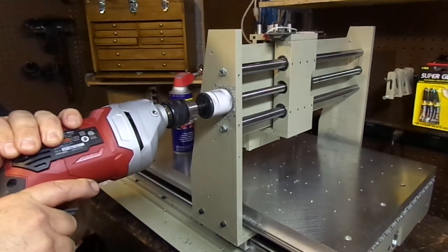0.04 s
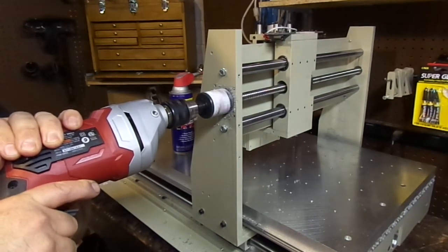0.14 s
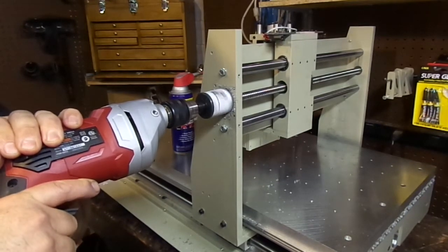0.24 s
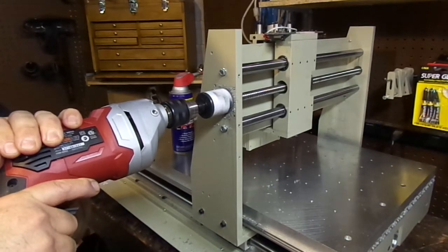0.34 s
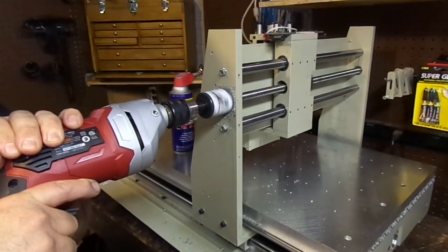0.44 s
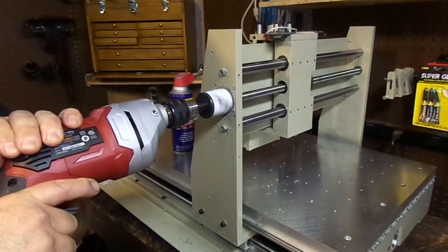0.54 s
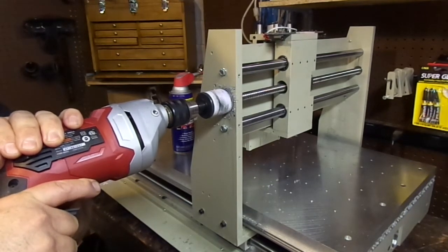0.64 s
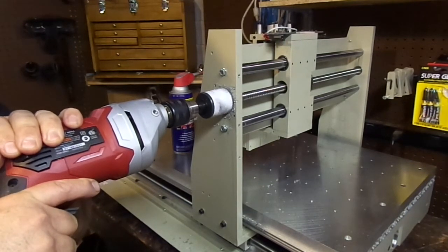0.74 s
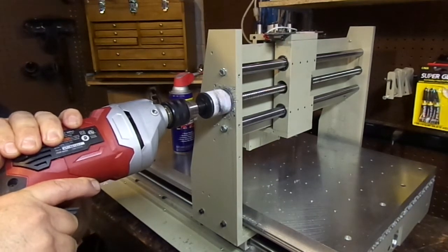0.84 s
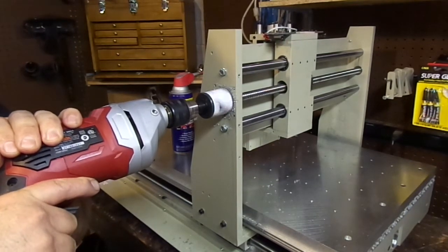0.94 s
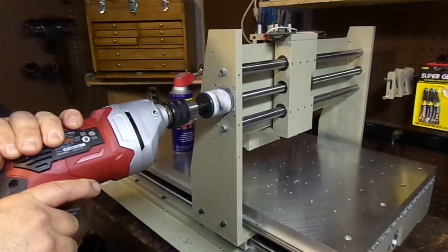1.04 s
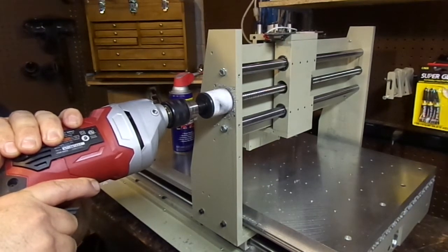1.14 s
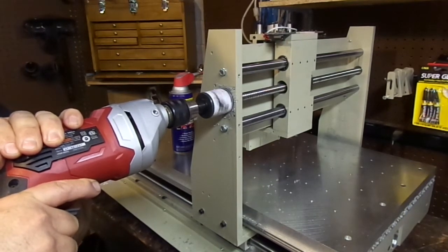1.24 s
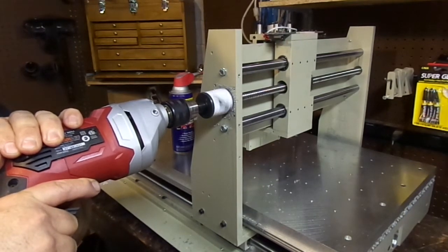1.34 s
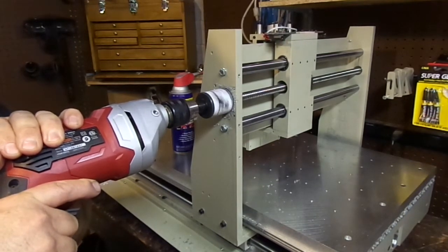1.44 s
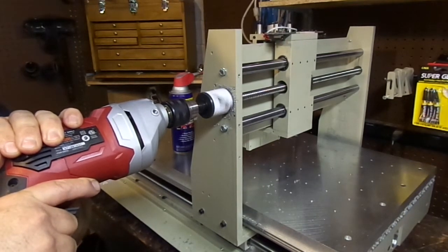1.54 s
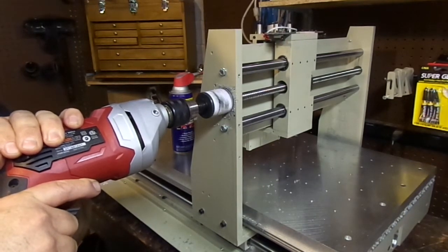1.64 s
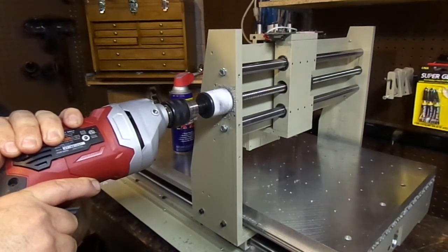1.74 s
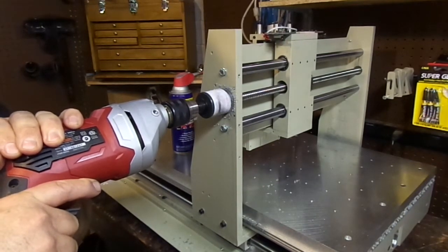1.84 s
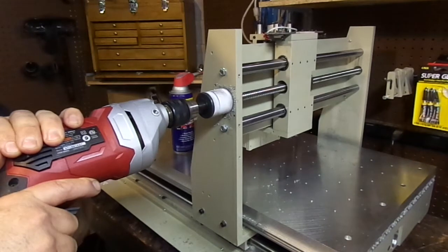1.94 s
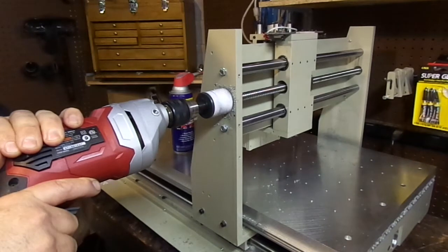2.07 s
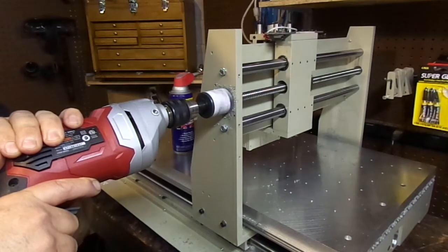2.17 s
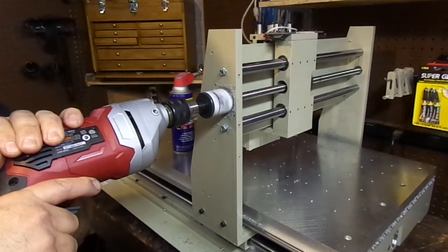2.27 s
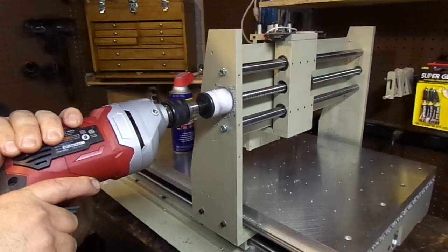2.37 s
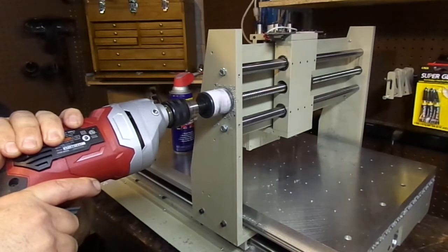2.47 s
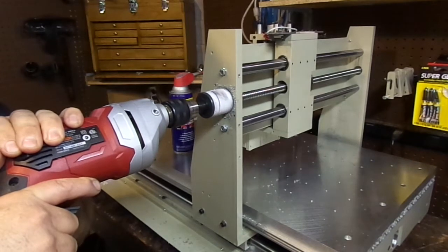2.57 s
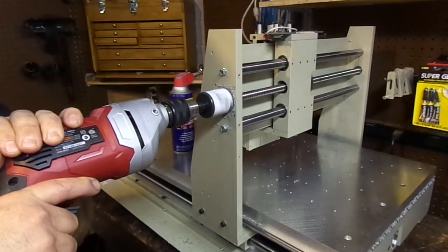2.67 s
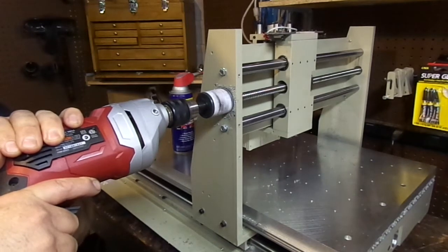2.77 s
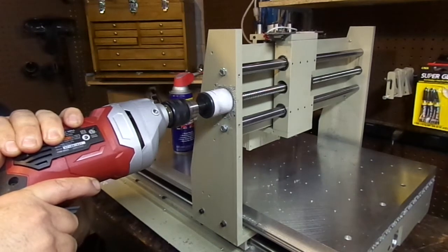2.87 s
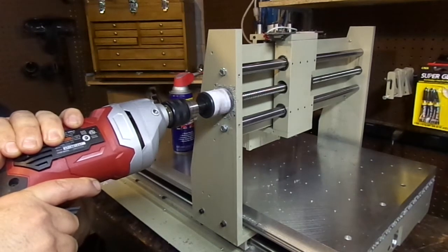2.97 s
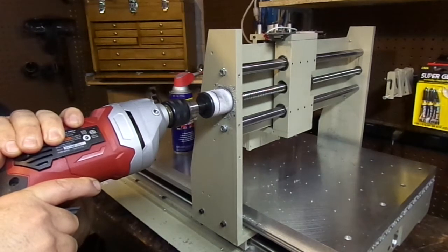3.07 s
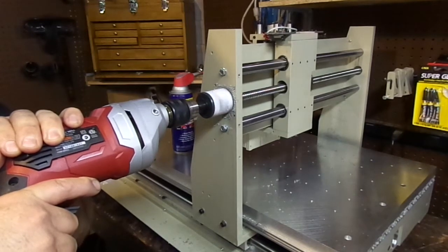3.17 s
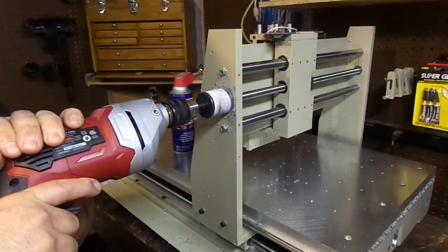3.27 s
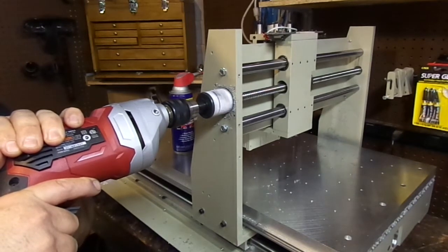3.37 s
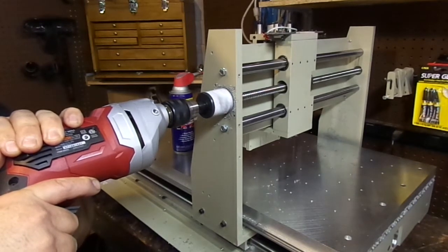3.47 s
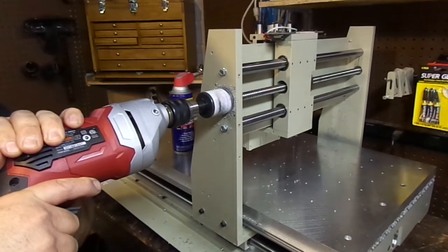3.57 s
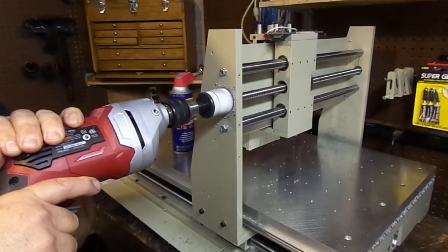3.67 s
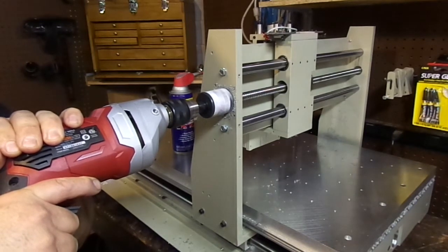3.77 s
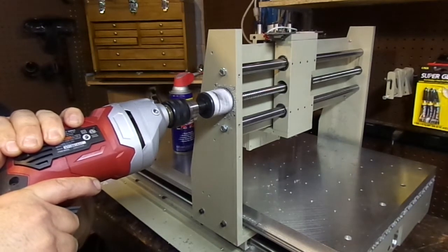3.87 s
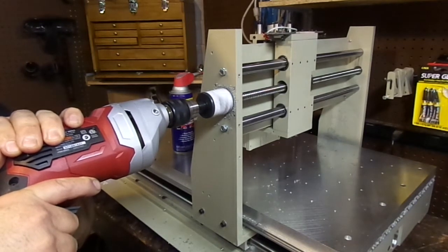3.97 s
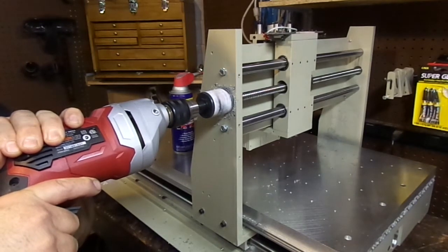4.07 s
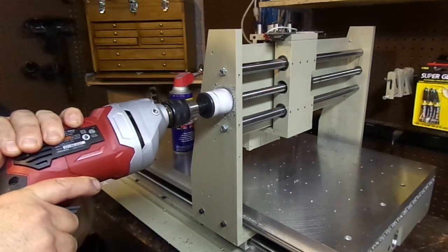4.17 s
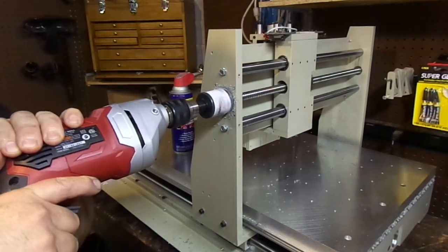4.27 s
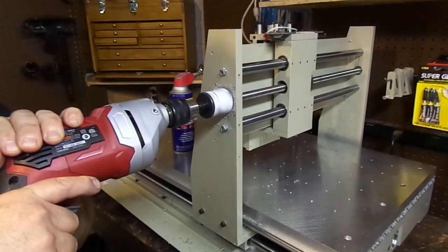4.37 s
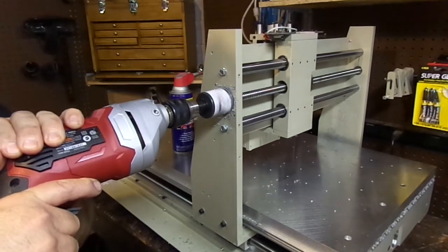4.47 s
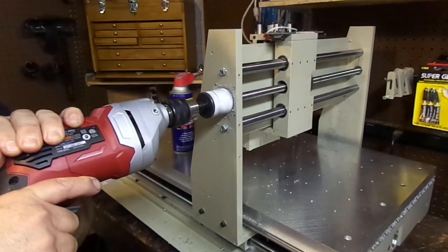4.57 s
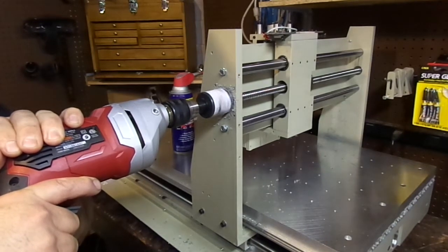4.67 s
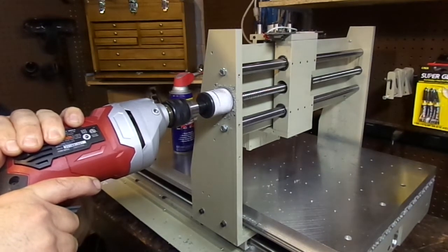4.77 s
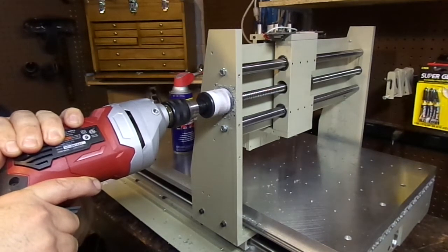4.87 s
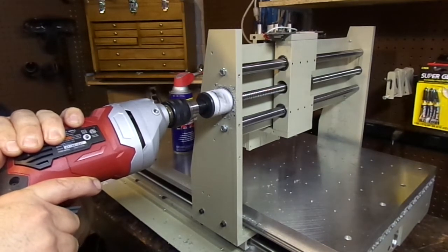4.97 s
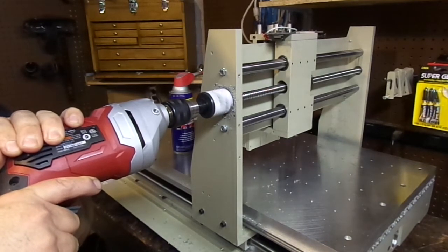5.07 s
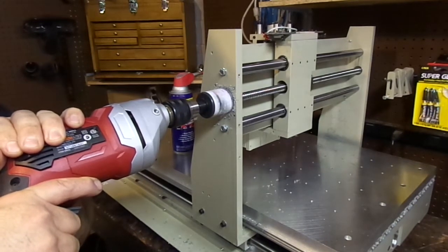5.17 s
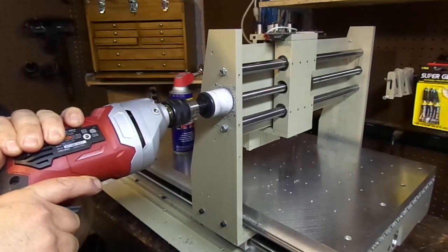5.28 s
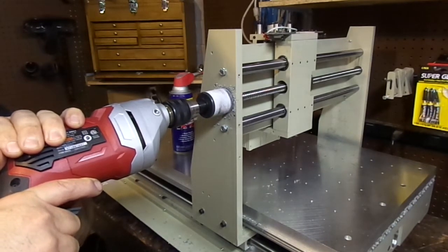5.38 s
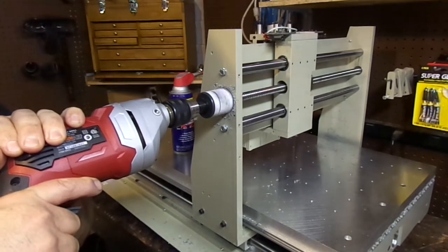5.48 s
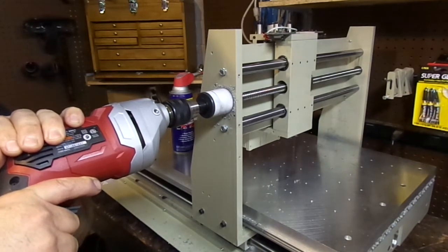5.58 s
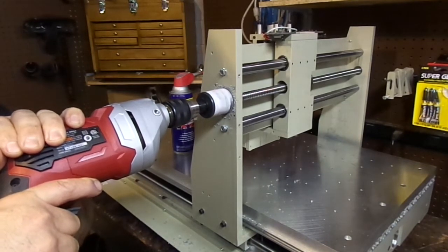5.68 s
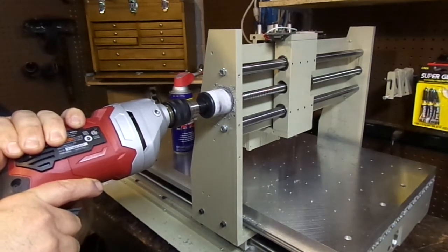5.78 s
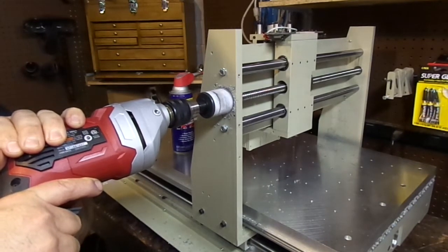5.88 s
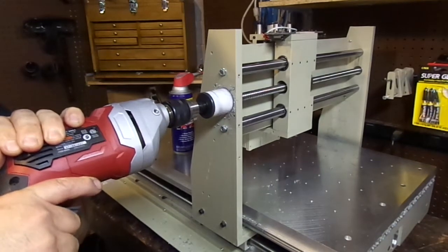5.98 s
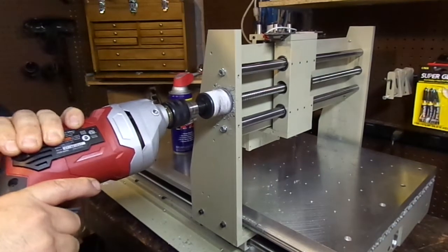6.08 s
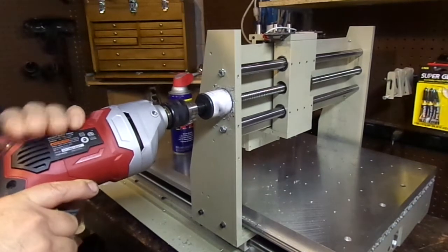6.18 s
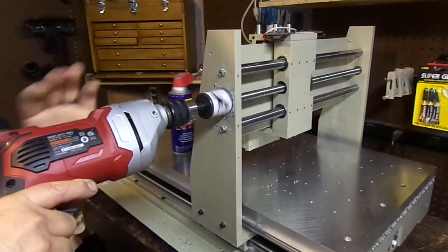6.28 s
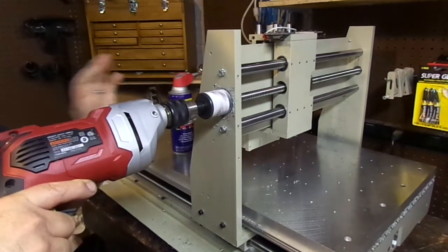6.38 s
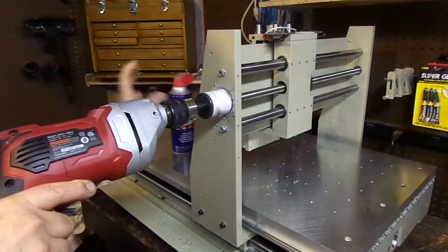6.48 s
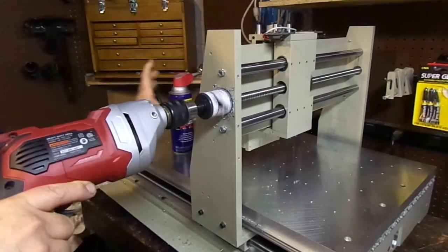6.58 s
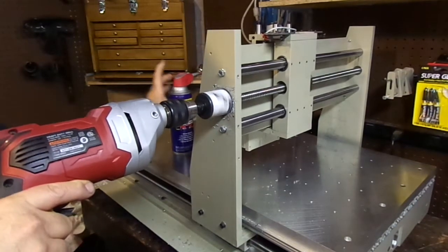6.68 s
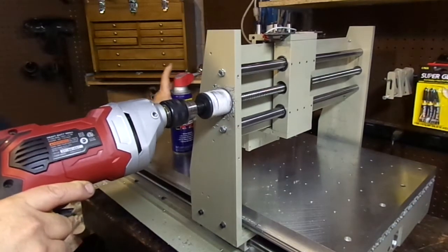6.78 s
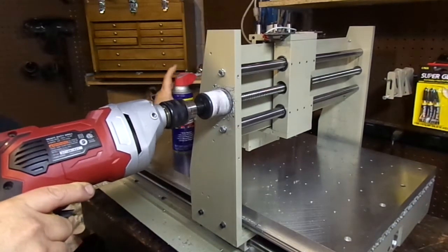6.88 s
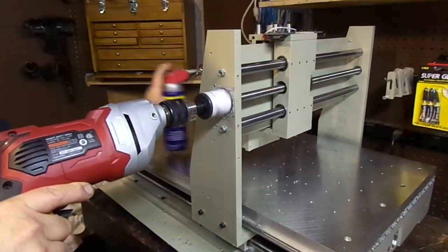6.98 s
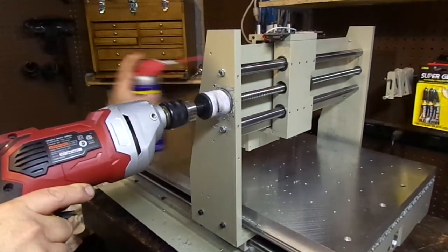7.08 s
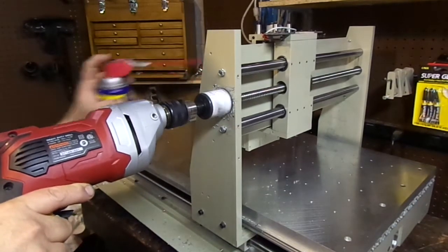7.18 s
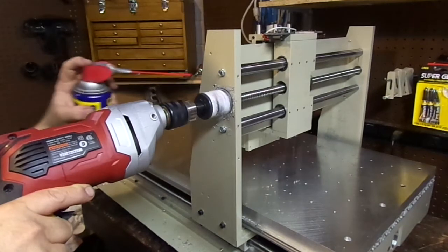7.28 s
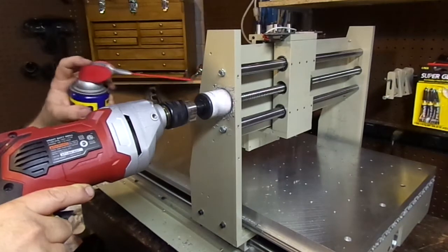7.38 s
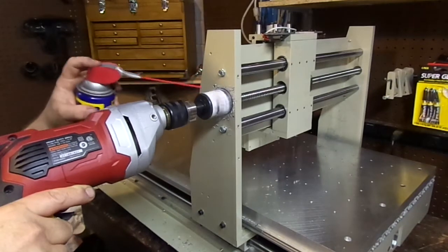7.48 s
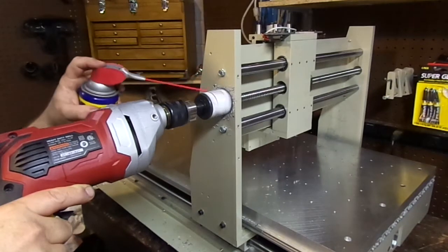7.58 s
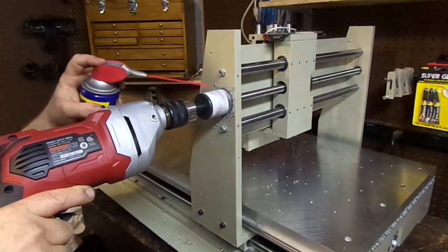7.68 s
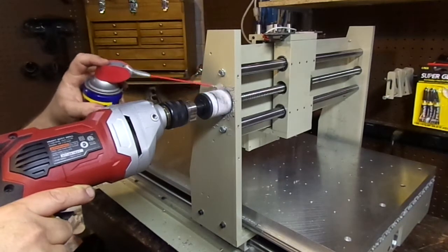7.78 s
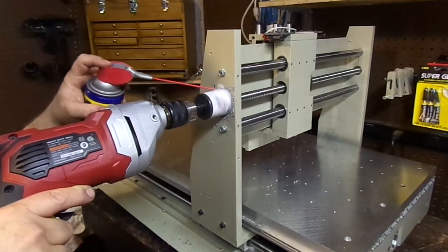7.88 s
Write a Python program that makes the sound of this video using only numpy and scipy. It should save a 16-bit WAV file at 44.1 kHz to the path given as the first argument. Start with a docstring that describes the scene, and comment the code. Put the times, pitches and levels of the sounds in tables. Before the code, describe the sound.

A corded drill whines and growls under load as a hole saw scrapes ringing metal, then slows, clatters loosely and revs up again.

```python
"""A hand drill drives a hole saw into the metal side plate of a machine frame in a small workshop.
Its gear mesh whines as harmonics of a wavering tooth rate; the saw teeth scrape as dense random chips.
Both ring through peaking filters for plate, gear case and saw cup; squeaks, throbs, whistle, hiss and
rumble join in. Near the end the push eases off: the drill slows, the cut thins out, then the motor
speeds up lightly loaded."""
import sys
import numpy as np
from scipy import signal
from scipy.fft import rfft, irfft, next_fast_len
from scipy.io import wavfile
from scipy.ndimage import uniform_filter1d

SR = 44100
rng = np.random.default_rng(int(sys.argv[2]) if len(sys.argv) > 2 else 0)


def dump_mix(stems):
    """Bounce the given channels to the path in sys.argv[1] as a 16-bit WAV at rate SR."""
    frames = np.atleast_2d(stems).T  # one column per channel
    limited = np.clip(frames, -1, 1)  # hard clip at full scale
    pcm = np.round(limited * 32767).astype(np.int16)
    wavfile.write(sys.argv[1], SR, pcm)


def volts_from_db(level):
    """Convert decibel levels to linear amplitude ratios."""
    exponent = np.asarray(level, float) / 20
    return 10 ** exponent


N = 349272

# mean gear mesh rate outside the binds, set by trigger and load: time_s, mesh_hz
MESH_SPEED = [(0, 670), (.15, 805), (.32, 860), (.59, 812), (.84, 826), (1.0, 800), (1.6, 755), (1.79, 886),
              (2.0, 966), (2.27, 1015), (2.46, 918), (2.83, 902), (3.3, 998), (3.63, 948), (3.84, 862),
              (4.03, 908), (4.22, 892), (4.58, 782), (5.08, 886), (5.17, 860), (5.33, 876), (5.39, 950),
              (5.5, 1015), (5.6, 1110), (5.86, 1208), (5.92, 1172), (6.08, 800), (6.17, 600), (6.25, 545),
              (6.5, 520), (7.31, 783), (7.92, 918)]
# spans in which the saw binds and the drill bogs down: start_s, end_s
BINDS = [(.88, 1.03), (1.11, 1.55), (4.26, 4.49)]
# how hard the drill works, and extra torque on the gear teeth: time_s, effort_db, torque_db
EFFORT = [(0.0, -23.5, 0), (0.17, -21, 0.2), (0.79, -21, 0.7), (0.97, -23, -1.5), (1.04, -20, -0.5),
          (1.17, -22, -0.8), (2.29, -18.5, 0.8), (2.87, -21.5, 0), (3.09, -16.5, -0.7), (3.66, -19.5, 0.1),
          (3.9, -20.5, -0.2), (4.15, -17.5, 1), (4.32, -22, 0.5), (4.52, -19, -1.1), (5.25, -20, 1),
          (5.4, -15.5, 0.3), (5.93, -16.5, -1.1), (6.15, -21, 0.1), (6.17, -24.5, 0.1), (6.2, -27, 2),
          (6.35, -25.5, 5), (6.46, -29.5, 3), (7.9, -27, -4), (7.92, -28, -2)]
# layer responses: level_db, effort_db_per_db, speed_db_per_db, released_change_db, bound_change_db
GEAR_RESPONSE = (-23.5, 0.46, -0.1, -16.5, -2)
CUTTING_RESPONSE = (-26, 0.02, 2.04, -5, 1)
RUBBING_RESPONSE = (-26.5, 0.82, 0.5, 3.5, 0.5)
AIRFLOW_RESPONSE = (-30.5, -0.16, 1.4, -5, -.5)
SHAKING_RESPONSE = (-54, 1.33, -3, -7, -2)
# harmonics of the gear mesh: multiple_of_mesh_rate, relative_db
MESH_TONES = [(1, -6), (2, 10.5), (3, 4.5), (4, 0.5), (5, -0.5), (6, 0), (7, -5)]
# thin motor whistle over the armature hum: time_s, gain_db
WHISTLE_GAIN = [(0, -52), (5.4, -46), (5.85, -41), (6.05, -62), (7.2, -53), (7.33, -42), (7.62, -33.5),
                (7.92, -41)]
# tones of the armature: multiple_of_mesh_rate, relative_db
WHISTLE_TONES = [(1 / 6, -27), (12, 0), (16, -12)]
# short squeaks, and gear throbs as the drill slows: start_s, relative_db, pitch_hz, rise_s
SQUEAKS_AND_THROBS = [(1.042, -16, 1550, 0.0093), (3.127, -8, 1650, 0.003), (4.302, -21.5, 3410, 0.0071),
                      (4.476, -15, 3016, 0.0079), (5.37, -9, 1655, 0.0086), (5.749, -8.5, 1650, 0.0044),
                      (5.877, -11.5, 1660, 0.01), (5.91, -10, 3410, 0.0082), (5.955, -6, 3200, 0.0046),
                      (5.982, -13, 2950, 0.0087), (6.066, -11, 2384, 0.0089), (6.072, -7, 3120, 0.0024),
                      (6.106, -16, 3330, 0.0073), (6.152, -9.5, 2370, 0.012), (6.285, -16, 2210, 0.008),
                      (6.358, -17.5, 2600, 0.0053), (6.546, -18, 2310, 0.011), (6.717, -18, 2270, 0.0059),
                      (6.821, -15, 2480, 0.0053), (7.042, -23, 2780, 0.035), (7.26, -19, 2390, 0.01),
                      (7.473, -22, 2527, 0.0088), (7.637, -20, 2720, 0.0082)]
# saw cup against the wall of the hole: time_s, rubbing_change_db, shaking_change_db
KNOCKS = [(1.05, 2.5, 1.5), (3.13, 1.5, 6), (3.33, 0, 5), (4.1, -4, 13.5), (4.52, 7, 11), (5.84, 1, -7),
          (7.06, 3, -3), (7.28, 3.5, -3), (7.48, 3, -2), (7.85, 3, 4)]
# resonances of plate and gear case: centre_hz, width_hz, peak_db
PLATE_MODES = [(425, 12, 6), (704, 34, 5), (887, 123, 11.5), (1200, 64, 5.5), (1244, 48, -12),
               (1402, 30, 8), (1650, 77, -3.5), (1840, 97, 1), (2100, 24, -2), (2105, 55, 4), (2080, 36, 5),
               (2403, 45, 6), (2330, 28, -5), (2590, 6.1, -13), (2847, 18, 12.5), (2915, 26, 5.5),
               (3120, 47, 3), (3077, 160, 8.5), (3410, 170, 8), (3446, 27, -15.5), (3548, 96, 3.5),
               (3730, 69, 6.5), (3680, 56, 2.5), (4110, 35, 7.5), (4510, 43, 6), (4700, 30, 7),
               (5180, 41, -5), (5660, 35, 10.5), (6540, 54, 7), (8090, 660, 13.5)]
# resonances of saw cup and chuck: centre_hz, width_hz, peak_db
CUP_MODES = [(650, 76, 2.5), (878, 30, 17.5), (1073, 87, 8.5), (1278, 25, 12), (1610, 360, 3.5),
             (2078, 106, 4.5), (2240, 95, 3.5), (2449, 233, 7.5), (2800, 62, 7.5), (2980, 27, 13),
             (3630, 64, 2.5), (3880, 62, 6), (5350, 70, 14.5), (5900, 50, -32)]
# resonances of the motor housing: centre_hz, width_hz, peak_db
HOUSING_MODES = [(5330, 90, 6.5), (8260, 440, 2.5), (10240, 760, 2)]
# spectrum shaping of gears, cut, rubbing cup, airflow, rumble and wide image: frequency_hz, gain_db
GEAR_COLOUR = [(180, -41), (300, -3), (872, -17), (1150, -42), (1420, -9), (1800, -7), (2450, 1),
               (2900, -0.5), (3250, 0.5), (3620, 3.5), (5090, -4), (9000, -15), (11700, -51), (19800, -120)]
CUT_COLOUR = [(88, -47), (150, -20), (300, -15), (480, -5), (750, -0.5), (1000, -9), (1250, -5),
              (2400, -17), (3500, -1), (5100, -8), (8000, -26), (10400, -41)]
CUP_COLOUR = [(180, -34), (300, -13), (450, -7.5), (800, -11), (1200, -13), (1800, -4.5), (2450, -4),
              (3800, -9), (4300, -27.5), (7500, -17), (9750, -20.5)]
AIRFLOW_COLOUR = [(2350, -33), (4000, -9), (5100, -14.5), (5790, -10), (6370, -15.5), (10300, -13.5),
                  (13500, -16.5), (15000, -28)]
RUMBLE_COLOUR = [(12, -48), (20, -18), (38, -43), (75, -4.5), (124, -6.5), (265, 2.5), (300, -2),
                 (390, -43), (660, -120)]
WIDE_COLOUR = [(60, -12), (240, 1.5), (940, -9.5), (3710, -6), (14600, 8)]

MESH_CYCLES_PER_TURN = 34  # mesh cycles per wobble of pitch and level; one turn of a gear
USUAL_EFFORT_DB, USUAL_MESH_HZ = -20, 900  # where the layers have their own levels
BOGGED_MESH_HZ, BIND_EDGE_S = 716, 0.07
RELEASE_S, RELEASE_EDGE_S = 6.1, 0.12  # the push on the saw ends


def rms_one(x):
    """Scale to rms 1."""
    return x / np.sqrt(np.mean(x ** 2) + 1e-20)


def in_time(rows):
    """Interpolate the columns of a time table to one value per sample."""
    time_s, *columns = np.transpose(rows)
    return [np.interp(np.arange(N) / SR, time_s, column) for column in columns]


def span(start_s, end_s, edge_s):
    """Gate of 1 between start and end, 0 outside, with straight edges."""
    half_s = edge_s / 2
    corners_s = [start_s - half_s, start_s + half_s, end_s - half_s, end_s + half_s]
    return np.interp(np.arange(N) / SR, corners_s, [0, 1, 1, 0])


def coloured(x, points):
    """Impose a spectrum, interpolated in dB over log frequency."""
    size = next_fast_len(N)
    hz, db = np.transpose(points)
    log_hz = np.log(np.fft.rfftfreq(size, 1 / SR) + 1)
    gain = volts_from_db(np.interp(log_hz, np.log(hz), db))
    return irfft(rfft(x, size) * gain, size)[:N]


def drift(rate_hz):
    """Slow chance of rms 1: noise through two equal one-pole low-passes."""
    pole = np.exp(-2 * np.pi * rate_hz / SR)
    noise = rng.standard_normal(N + SR)
    settled = signal.lfilter([1], [1, -2 * pole, pole * pole], noise)[SR:]
    return rms_one(settled)


def ring(x, modes):
    """Metal parts lift or notch each resonance: a chain of peaking filters."""
    hz, width_hz, db = np.transpose(modes)
    a, w = volts_from_db(db / 2), 2 * np.pi * hz / SR
    alpha = np.pi * np.abs(width_hz) / SR
    norm = 1 + alpha / a
    middle = -2 * np.cos(w)
    sos = np.transpose([1 + alpha * a, middle, 1 - alpha * a, norm, middle, 1 - alpha / a] / norm)
    return signal.sosfilt(np.ascontiguousarray(sos), x)


def tones(cycles, table, rough, flicker_hz):
    """Multiples of a rotation, each smeared into a narrow band by random level and phase."""
    total = np.zeros(N)
    for multiple, db in table:
        smear = 1 + rough * (drift(flicker_hz) + 1j * drift(flicker_hz))
        total += volts_from_db(db) * np.imag(smear * np.exp(2j * np.pi * multiple * cycles))
    return total


def workshop_reflections(x):
    """Walls and benches reflect: a decaying, dulled noise tail of unit energy after a short gap."""
    t60_s, gap_s = 0.25, 0.004
    t = np.arange(SR // 2) / SR
    tail = rng.standard_normal(len(t)) * volts_from_db(-60 * t / t60_s) * (t > gap_s)
    tail = signal.lfilter([1], [1, -0.45], tail)
    return signal.fftconvolve(x, tail / np.linalg.norm(tail))[:N]


def widening(effort_db):
    """Side gain that opens for short random moments, more often at low effort; mono in between."""
    is_open = drift(5.33) - 0.1 * effort_db > 1
    return volts_from_db(-19) * uniform_filter1d(is_open * 1.0, size=600)


def shaking_rumble(level_db):
    """Shaking of the machine: coloured low noise with slow random level."""
    noise = rms_one(coloured(rng.standard_normal(N), RUMBLE_COLOUR))
    return volts_from_db(level_db + 2.7 * drift(4.6)) * noise


def frame_drone(mesh_hz):
    """A shaft tone below the mesh, with some noise, excites the frame's narrow low resonance."""
    shaft = np.sin(2 * np.pi * np.cumsum(0.432 * mesh_hz) / SR)
    shaft += 0.4 * rng.standard_normal(N)
    return volts_from_db(-37) * signal.lfilter(*signal.iirpeak(432, 28.0, fs=SR), shaft)  # centre Hz, Q


def motor_airflow(turn):
    """Airflow noise swells slightly with the gear turn and at random, and rings in the housing."""
    airflow = rng.standard_normal(N) * volts_from_db(0.18 * np.sin(turn) + 0.39 * drift(16))
    return rms_one(ring(coloured(airflow, AIRFLOW_COLOUR), HOUSING_MODES))


def armature_whistle(mesh_hz, released):
    """Armature hum and thin whistle follow the speed, with less jitter after the release."""
    gain_db, = in_time(WHISTLE_GAIN)
    jitter = 0.005 * released + 0.014 * (1 - released)  # share of the speed
    cycles = np.cumsum(mesh_hz * (1 + jitter * drift(60))) / SR
    return volts_from_db(gain_db) * tones(cycles, WHISTLE_TONES, rough=0.6, flicker_hz=25)


def knocks():
    """Knocks of the cup briefly change rubbing and shaking by Gaussian swells in dB."""
    time_s, *changes_db = np.transpose(KNOCKS)
    sigma_s = 0.018
    swell = np.exp(-0.5 * ((np.arange(N) / SR - time_s[:, None]) / sigma_s) ** 2)
    return np.array(changes_db) @ swell


def squeaks_and_throbs():
    """Each squeak or throb is a short wavering tone with a rattle that rings in the saw cup."""
    waver_share = 0.02  # of the pitch
    wavering, rattles = np.zeros(N), np.zeros(N)
    t = np.arange(SR // 8) / SR
    for start_s, db, pitch_hz, rise_s in SQUEAKS_AND_THROBS:
        noise = rng.standard_normal(len(t))
        shape = volts_from_db(db) * t / rise_s * np.exp(1 - t / rise_s)
        waver = 1 + waver_share * rms_one(uniform_filter1d(noise, size=90))
        i = round(start_s * SR)
        wavering[i:i + len(t)] += shape * np.sin(2 * np.pi * pitch_hz * np.cumsum(waver) / SR)
        rattles[i:i + len(t)] += shape * noise
    band = signal.butter(2, [1500, 4500], "band", fs=SR, output="sos")
    rattles = ring(signal.sosfilt(band, rattles), CUP_MODES)
    return volts_from_db(-7) * wavering + volts_from_db(-14.5) * rattles


def scraping(colour, turn, chips_per_s, turn_db, patchy_db):
    """Dense tiny chips of uneven size; their level varies over each gear turn and at random."""
    hits = rng.random(N) < chips_per_s / SR
    size = volts_from_db(1.13 * rng.exponential(1, N))
    chips = hits * size * rng.choice([-1, 1], N)
    bite = volts_from_db(turn_db * np.sin(turn) + patchy_db * drift(28.0))
    return rms_one(coloured(chips * bite, colour))


def gears(mesh_hz, turn):
    """Gear run-out wobbles mesh pitch and level once a turn; the pitch also jitters at random throughout."""
    speed = 1 + 0.012 * np.sin(turn) + 0.015 * drift(70)
    cycles = np.cumsum(mesh_hz * speed) / SR
    mesh = tones(cycles, MESH_TONES, rough=0.65, flicker_hz=55)
    runout = volts_from_db(3 * np.sin(turn + 2))
    return rms_one(coloured(mesh * runout, GEAR_COLOUR))


def scene():
    """Effort, speed, release and binding drive the layers; gears, cut and rubbing ring in metal."""
    bound = sum(span(start_s, end_s, BIND_EDGE_S) for start_s, end_s in BINDS)
    released = span(RELEASE_S, N / SR + 1, RELEASE_EDGE_S)
    mesh_hz = (1 - bound) * in_time(MESH_SPEED)[0] + bound * BOGGED_MESH_HZ
    turn = 2 * np.pi * np.cumsum(mesh_hz) / SR / MESH_CYCLES_PER_TURN
    effort_db, torque_db = in_time(EFFORT)
    effort_db = effort_db - USUAL_EFFORT_DB
    speed_db = 20 * np.log10(mesh_hz / USUAL_MESH_HZ)

    state = [np.ones(N), effort_db, speed_db, released, bound]
    responses = [GEAR_RESPONSE, CUTTING_RESPONSE, RUBBING_RESPONSE, AIRFLOW_RESPONSE, SHAKING_RESPONSE]
    gear_db, cut_db, rub_db, airflow_db, shake_db = np.array(responses) @ state
    rub_change_db, shake_change_db = knocks()

    rumble = shaking_rumble(shake_db + shake_change_db)
    drone = (1 - released) * volts_from_db(effort_db + 4.5 * drift(4.9)) * frame_drone(mesh_hz)
    hiss = volts_from_db(airflow_db) * motor_airflow(turn)
    whistle = armature_whistle(mesh_hz, released)

    loose_db = 1.3 * released * drift(20.0)  # the freed cup rattles unevenly in the hole
    rubbing = volts_from_db(rub_db + rub_change_db + loose_db) * scraping(
        CUP_COLOUR, turn, chips_per_s=16000, turn_db=-0.1, patchy_db=0.4)
    cutting = volts_from_db(cut_db) * scraping(
        CUT_COLOUR, turn, chips_per_s=20000, turn_db=1.1, patchy_db=-1.1)
    force = volts_from_db(gear_db + torque_db) * gears(mesh_hz, turn) + cutting
    ringing = volts_from_db(-3) * (ring(force, PLATE_MODES) + ring(rubbing, CUP_MODES))

    drill = ringing + squeaks_and_throbs() + drone + hiss + whistle
    mid = drill + volts_from_db(-15) * workshop_reflections(drill) + rumble
    side = widening(effort_db) * coloured(workshop_reflections(mid), WIDE_COLOUR)
    return np.array([mid + side, mid - side])


def roll_off(x):
    """The treble ends steeply here."""
    return signal.sosfilt(signal.butter(12, 15250, fs=SR, output="sos"), x)


def record(dry):
    """The microphone input rounds the peaks by soft saturation."""
    rounded = 0.75 * np.tanh(dry / 0.73)
    return roll_off(rounded)


dry = scene()
out = record(dry)
dump_mix(out)
```